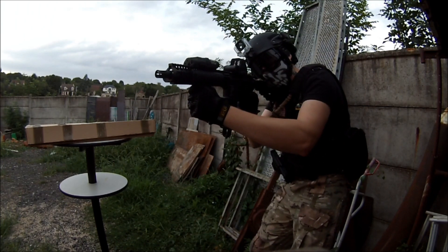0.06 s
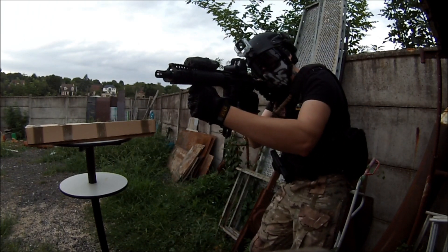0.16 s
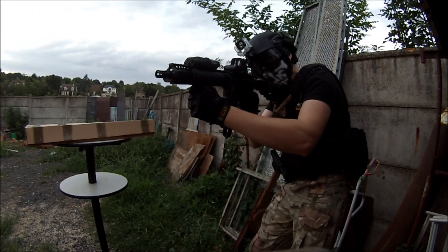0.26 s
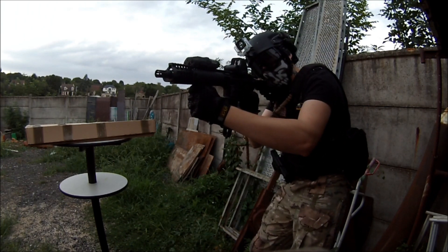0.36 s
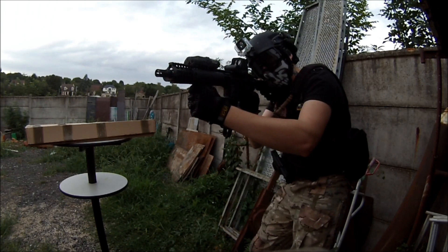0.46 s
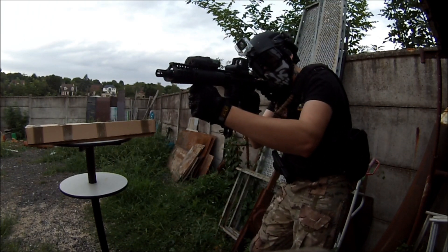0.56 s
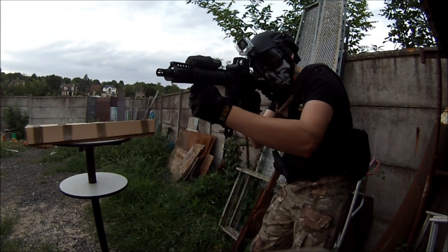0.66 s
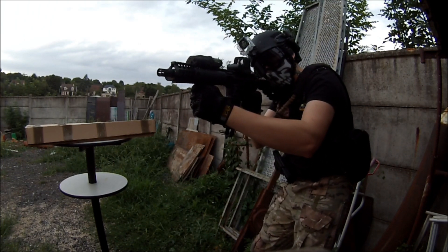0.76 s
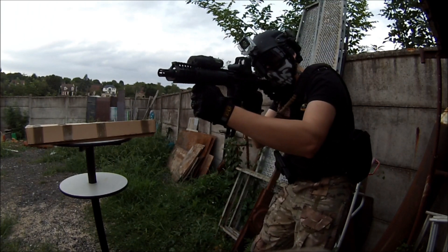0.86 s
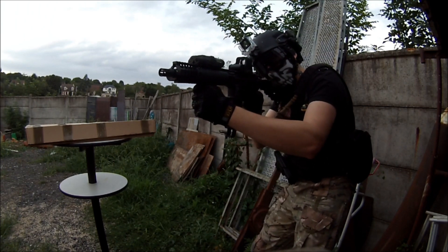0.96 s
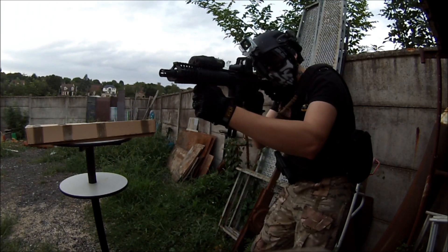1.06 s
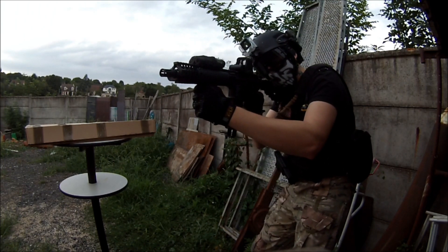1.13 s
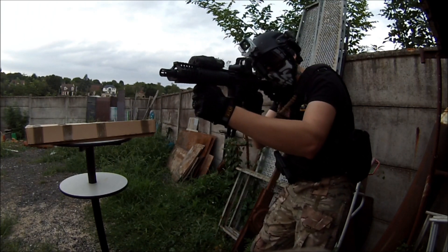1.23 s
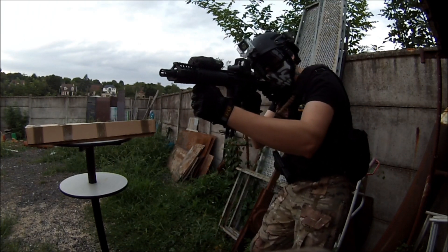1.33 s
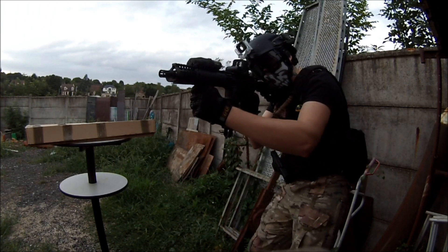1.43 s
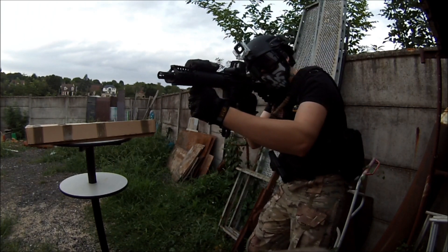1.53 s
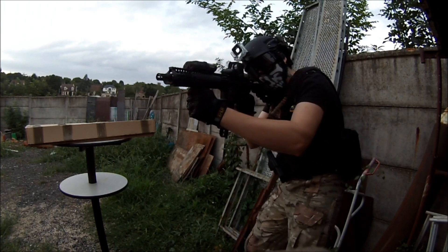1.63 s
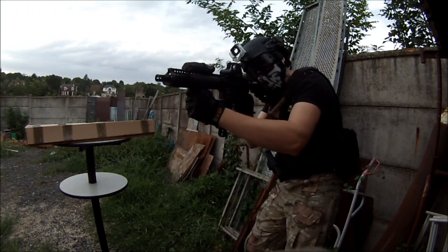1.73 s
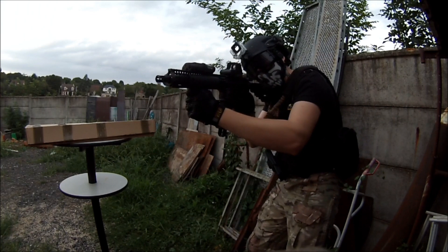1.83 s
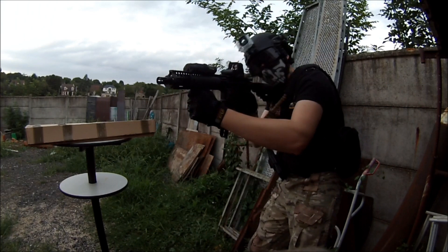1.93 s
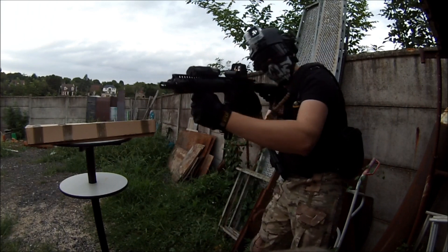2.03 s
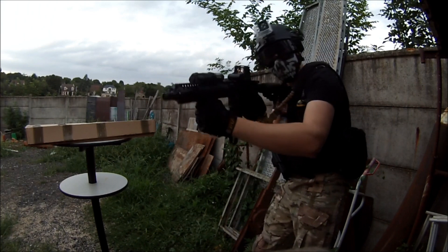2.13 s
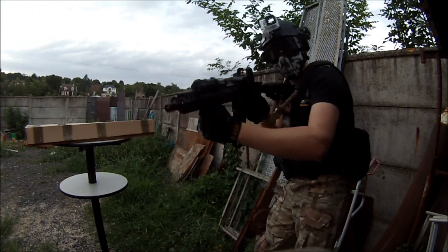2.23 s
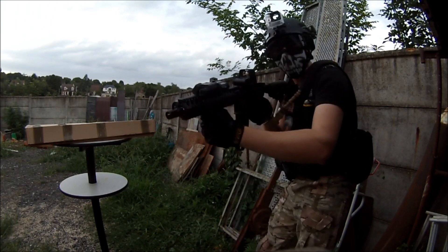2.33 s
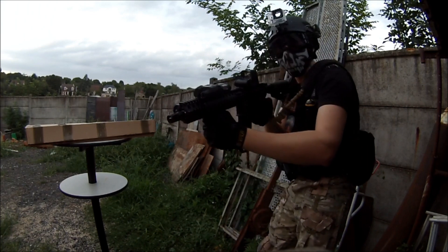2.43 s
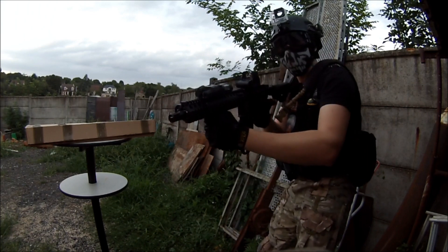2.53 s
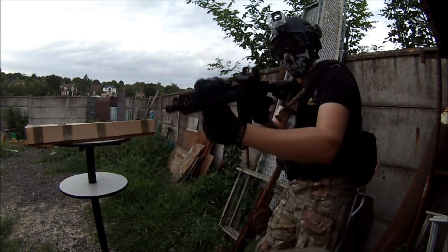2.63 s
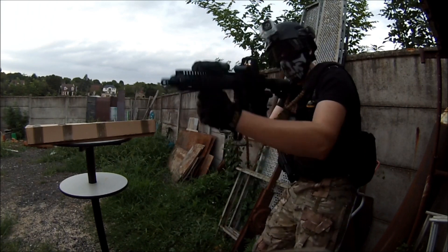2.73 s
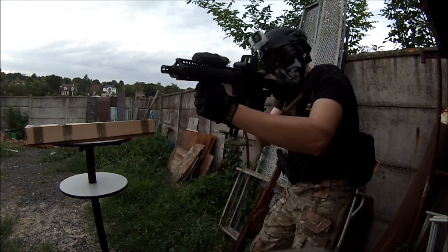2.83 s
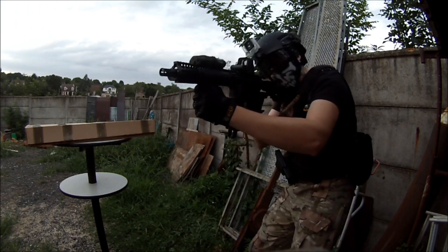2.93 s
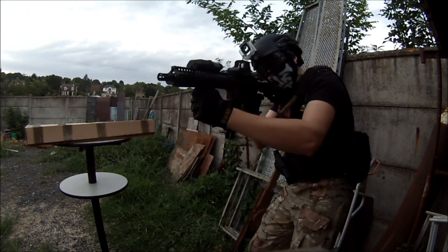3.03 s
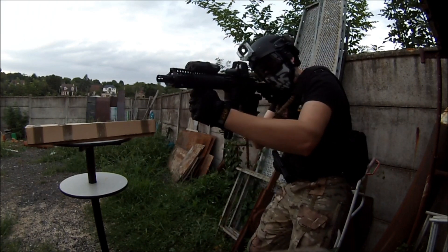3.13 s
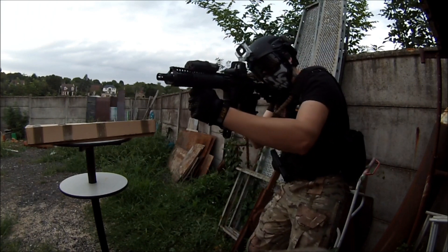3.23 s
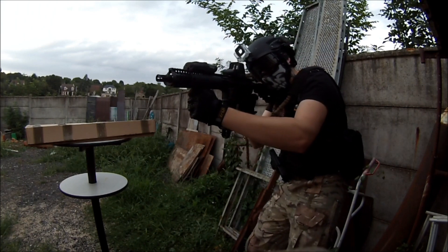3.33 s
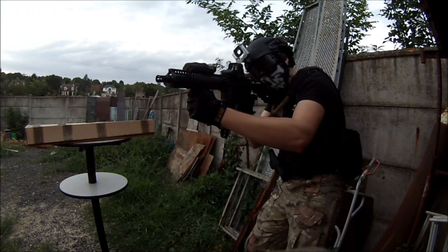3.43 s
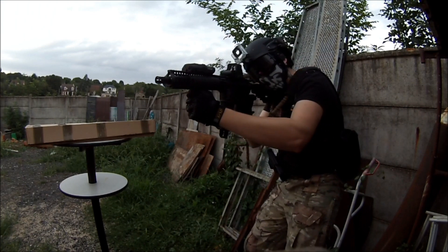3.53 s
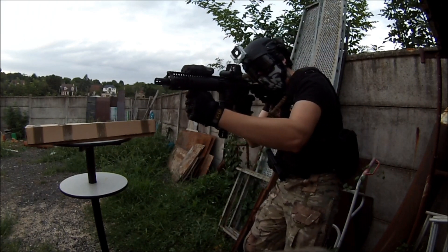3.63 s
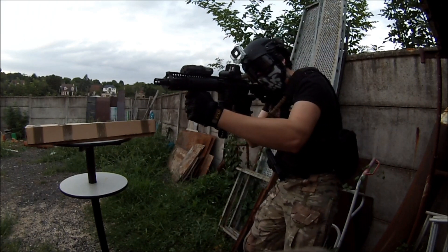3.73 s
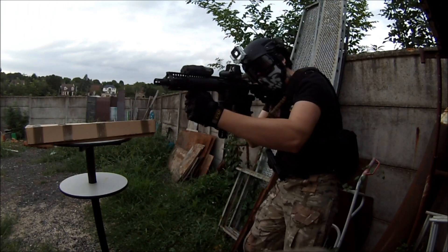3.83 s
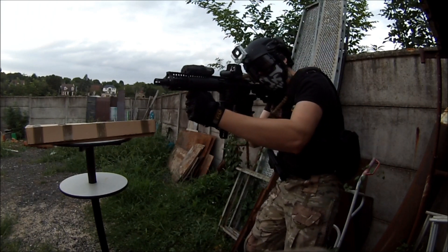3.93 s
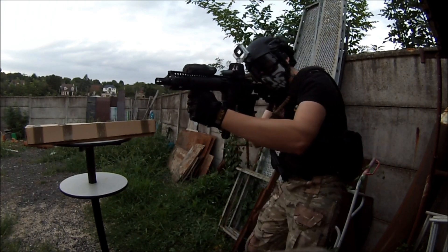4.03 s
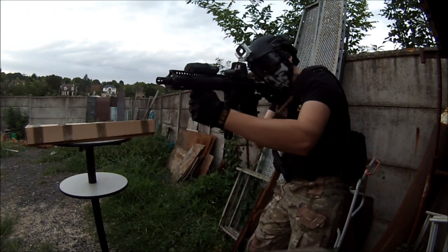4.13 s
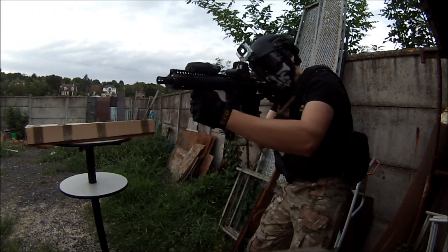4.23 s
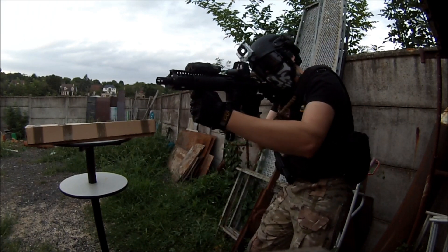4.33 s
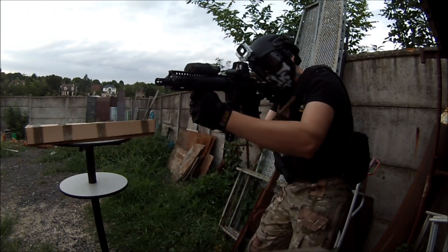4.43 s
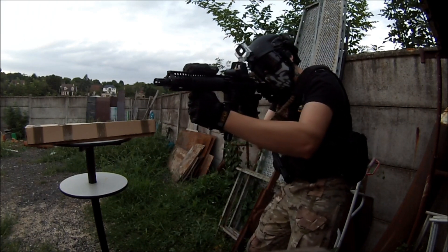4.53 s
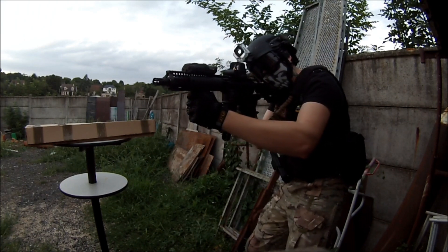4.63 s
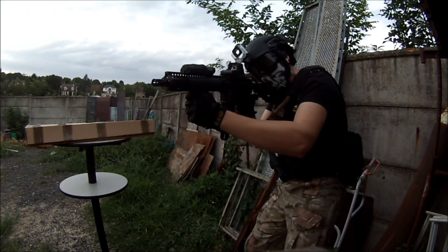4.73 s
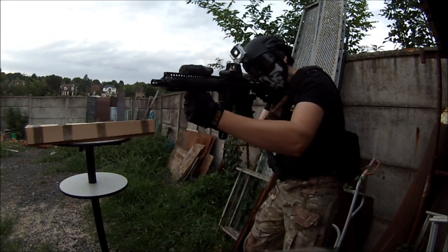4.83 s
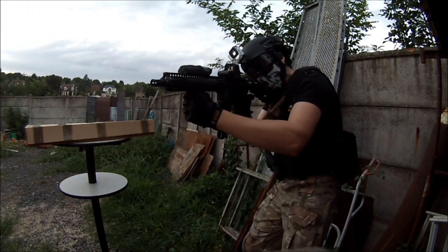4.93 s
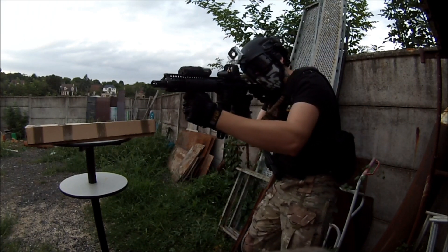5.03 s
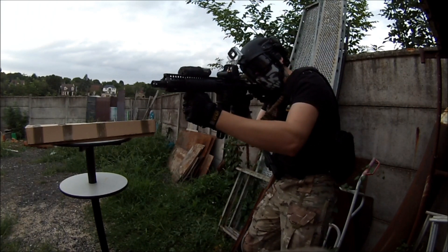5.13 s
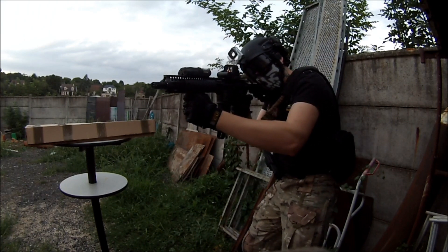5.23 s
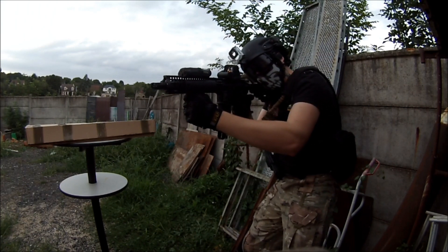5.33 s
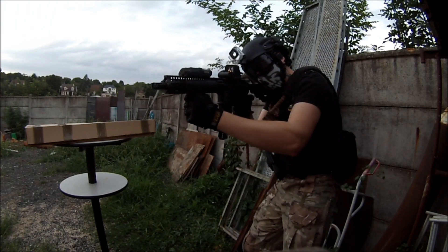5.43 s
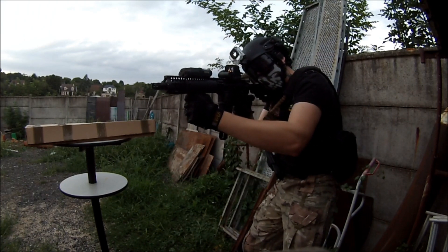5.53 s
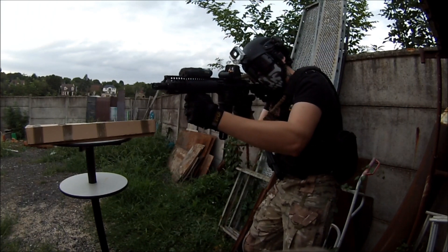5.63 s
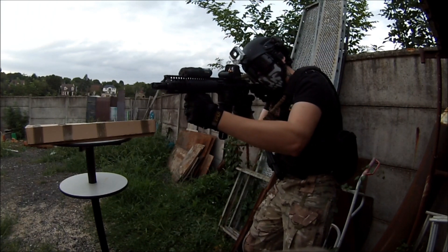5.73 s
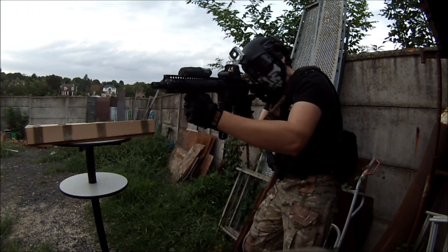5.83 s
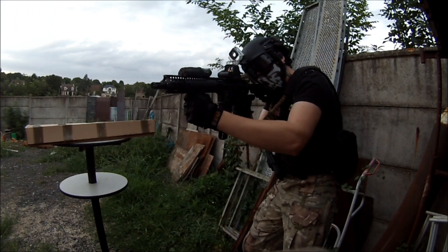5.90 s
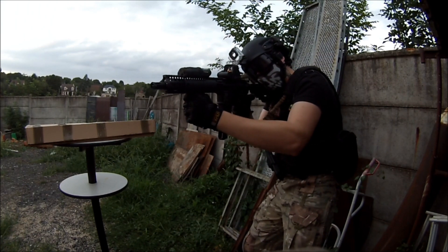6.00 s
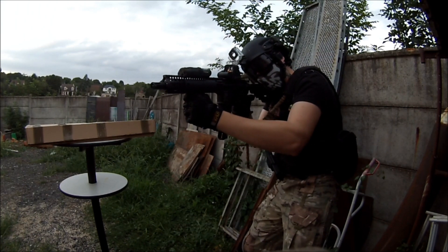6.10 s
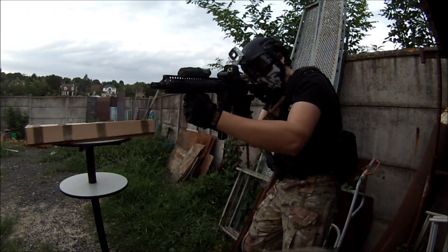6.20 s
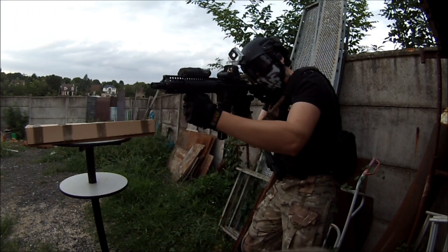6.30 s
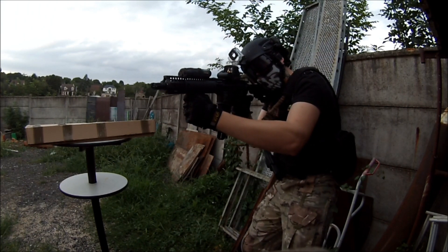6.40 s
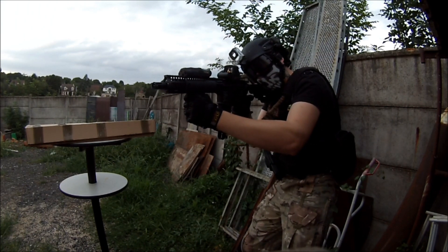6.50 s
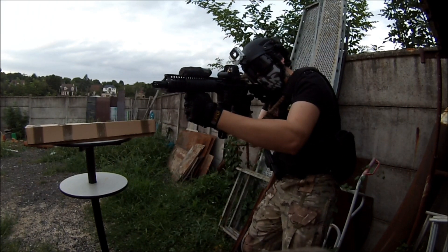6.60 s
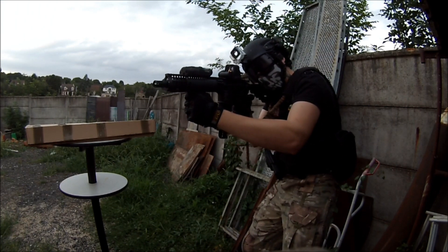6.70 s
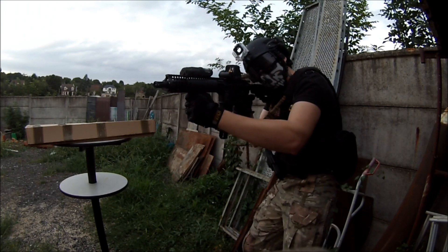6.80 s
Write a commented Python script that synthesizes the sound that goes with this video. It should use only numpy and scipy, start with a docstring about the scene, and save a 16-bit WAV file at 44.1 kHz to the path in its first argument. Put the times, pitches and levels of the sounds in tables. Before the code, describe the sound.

Short automatic bursts from a nearby electric airsoft gun outdoors, then spaced single shots, each a brief gear whine and a sharp snap.

```python
"""Rattling bursts from an electric airsoft rifle a couple of metres away in a walled yard, a pause, then
single shots. In each cycle the motor whines and the gears grind as they wind the spring, the nozzle
clacks, and the piston slams home, exciting the modes of the body. Pellets tick on a target, kit rustles
in the pause, and the yard reflects it all over light wind and distant town.
The slams overload the microphone."""
import sys
import numpy as np
from scipy import signal
from scipy.fft import rfft, irfft
from scipy.io import wavfile
from scipy.ndimage import map_coordinates

SR = 44100
rng = np.random.default_rng(int(sys.argv[2]) if len(sys.argv) > 2 else 0)


def wrap_up_sound(samples):
    """Save the sound to the file named by the first command line argument, as 16-bit audio."""
    columns = np.atleast_2d(samples).T
    # keep every value between -1 and 1, then stretch to whole-number steps
    tamed = np.clip(columns, -1, 1)
    steps = np.round(tamed * 32767).astype(np.int16)
    wavfile.write(sys.argv[1], SR, steps)


N = 302481
LEAD = SR // 4  # samples before t = 0: firing is already under way
SPAN = LEAD + N
MS = SR / 1000  # samples per ms
CYCLE_MS = np.arange(-4410, 4410) / MS  # time about a slam
AFTER_MS = CYCLE_MS[CYCLE_MS >= 0]


# Gearbox cycles, keyed settings (_ms: t/ms, _db: level/dB, wobble: fraction of speed).
# A burst starts from rest and runs on. Lead-in: a faint noise swells just before the gears bite.
CYCLES = {
    "from rest": dict(lead_in_ms=4.3, lead_in_db=-6, whine_db=-22.5, ease_db=-5.5, overtone_db=-1,
                      grind_db=-23.5, catch_db=0.5, drag_db=6, coast_ms=110, wobble=0.0098,
                      clack_db=-14, clack_lead_ms=39.8, slam_db=-3.5),
    "running": dict(lead_in_ms=46, lead_in_db=-1.5, whine_db=-30.5, ease_db=0, overtone_db=-1,
                    grind_db=-31, catch_db=-4, drag_db=8.5, coast_ms=390, wobble=0.033,
                    clack_db=-24.5, clack_lead_ms=27, slam_db=-6),
    "single": dict(lead_in_ms=18.4, lead_in_db=-6, whine_db=-25.5, ease_db=0, overtone_db=-0.45,
                   grind_db=-24, catch_db=3.5, drag_db=9, coast_ms=110, wobble=.005,
                   clack_db=-15, slam_db=-3.8)}
# Trigger pulls: first slam t/s, number of shots, pellet level/dB
BURSTS = [(0.13, 3, -4), (0.5327, 4, -3.5), (1.003, 4, -18.5), (1.4125, 6, -7), (3.2515, 1, -17)]
# Single shots: slam t/s, pinion bite level/dB, clack lead t/ms, pellet level/dB
SINGLES = [(3.5013, -14, 37, -11), (3.8185, -31, 38, -18), (3.9839, -8.5, 26.4, -15.5),
           (4.1452, -10, 37, -16), (4.3231, -6.5, 36, -16), (4.5025, -7, 37.4, -7), (4.672, -6.5, 40, -7.5),
           (5.0614, -8, 34, -11), (5.2209, -20, 38.5, -11.5), (5.3852, -7, 40, -11), (5.549, -27, 37, -24),
           (5.7466, -7.5, 36, -20), (5.9247, -14, 38, -14), (6.0902, -6, 39, -10), (6.2643, -11, 34, -14),
           (6.4059, -20, 29, -7), (6.6167, -5, 38, -11), (6.8299, -9, 36, -16)]

def shots(period_s=.08, late_s=.0008):
    """Periodic impacts under a held trigger. Rows: slam t/s, cycle, clack lead t/ms, pellet level/dB."""
    rows = [(-.06, "running", CYCLES["running"]["clack_lead_ms"], BURSTS[0][2])]  # still echoing at t = 0
    for first, count, pellet_db in BURSTS:
        for k in range(count):
            kind = "running" if k else "from rest"
            s = first + k * period_s + late_s * (k > 0)
            rows.append((s, kind, CYCLES[kind]["clack_lead_ms"], pellet_db))
    return rows + [(s, "single", lead_ms, pellet_db) for s, _, lead_ms, pellet_db in SINGLES]


# Spectra of gear grind, nozzle clack and hard impact: f/Hz, relative level/dB
GRIND = [(60, -35), (300, -11), (620, -5.5), (775, 2.5), (950, -4), (1200, -4), (1550, 1.5), (1850, -4),
         (2500, 0.5), (3200, 0.5), (4700, -3), (7400, -10), (9000, -13.5), (15000, -20.5)]
CLACK = [(50, -3.5), (150, 12.5), (350, 4.5), (800, -6.5), (1600, 10), (3000, -13.5), (5000, -15.5),
         (6500, 11), (9000, -28.5), (15000, -31.5)]
CRACK = [(200, -16), (1000, -6.5), (2600, 1), (4400, -3), (5800, -5), (7200, -5.5), (9000, -13),
         (15000, -18.5)]

def rifle(crack_db=-6, ring_db=-27, rattle_db=-25, ring_lag_ms=1.6, uneven_db=-0.14):
    """Source and resonator: winding, clack and slam excite the pinion, shell and body at each shot."""
    whines, grinds, clacks, pops, cracks, blows = np.zeros((6, SPAN))
    for s, kind, lead_ms, _ in shots():
        start = s + CYCLE_MS[0] / 1000
        force = undb(CYCLES[kind]["slam_db"] + uneven_db * rng.standard_normal())
        whine, grind = gears(kind)
        add(whines, whine, start)
        add(grinds, grind, start)
        add(clacks, undb(CYCLES[kind]["clack_db"]) * nozzle(), start - lead_ms / 1000)
        add(pops, force * slam(), start)
        add(cracks, force * piston_crack(), start)
        add(blows, np.array([force]), s + ring_lag_ms / 1000)
    pinion = resonate(whines, hz=3626, width_hz=600, db=2.5) + pinion_bites()
    shell = resonate(colour(grinds, GRIND), hz=787, width_hz=26, db=1)
    ring = signal.oaconvolve(blows + undb(rattle_db) * clacks, body_ring())[:SPAN]
    impacts = pops + colour(clacks, CLACK) + undb(crack_db) * colour(cracks, CRACK)
    return pinion + shell + impacts + undb(ring_db) * ring


def slam(pop_hz=2350, pop_db=3, closing_ms=3.02, peak_ms=1.135, sweep_ms=1.202, sink_ms=4,
         thump_hz=150, thump_db=-11, thump_ms=3.13, scatter=0.066, radiate_hz=55):
    """Compression: an air pop rises in pitch as the piston closes its cushion, over a low thump."""
    ms = CYCLE_MS - peak_ms
    hz = pop_hz * np.exp(np.where(ms < 0, ms / sweep_ms, -ms / sink_ms)) * (ms > -closing_ms)
    phase = 2 * np.pi * np.cumsum(hz) * (1 + scatter * rng.standard_normal()) / SR
    pop = -np.sin(phase) * swell(ms, rise=3.8, t60=6)
    thump = tone(thump_hz, CYCLE_MS) * np.exp(-np.abs(CYCLE_MS - 1) / thump_ms)
    radiation = signal.butter(1, radiate_hz, "high", fs=SR, output="sos")  # small body, little deep bass
    return signal.sosfilt(radiation, undb(pop_db) * pop + undb(thump_db) * thump)


def piston_crack():
    """Friction, then impact: the piston scrapes along the cylinder, touches its cushion and hits home."""
    scrape = 0.055 * contact(-CYCLE_MS, 14)
    touch = contact(CYCLE_MS + 0.9, 11)
    home = 2.38 * contact(CYCLE_MS - .7, 11.7)
    return scrape + touch + home


# Modes of the rifle body: f/Hz, relative level/dB, T60/s
BODY_MODES = [(172, 3, 0.047), (252.5, -5.5, 0.18), (473, 16.5, 0.017), (575, -10, 0.027), (770, 5, 0.036),
              (889, 10.5, 0.0075), (1366, -2.5, 0.057), (1473, -4, 0.039), (1437, 18, 0.023),
              (1470, -6.5, 0.052), (1750, -7, .025), (2410, -8, .03), (2620, 9.5, 0.095),
              (2800, -22.5, .03), (4410, -16, .025), (7400, -32, .02)]

def body_ring():
    """Impulse response as a sum of damped modes; neighbouring modes swing in antiphase."""
    t = np.arange(SR // 10) / SR
    return sum((-1) ** k * undb(db) * np.sin(2 * np.pi * hz * t) * fade(t, t60)
               for k, (hz, db, t60) in enumerate(BODY_MODES))


def nozzle(bounce_ms=1.7):
    """Repeated impact: the nozzle is drawn back with a tick and rattles against its stop."""
    lag_ms = rng.normal(0, 1.0)
    tick = 0.93 * contact(CYCLE_MS + 1.1, 2.9)
    stop = 1.1 * contact(CYCLE_MS + 1, 24)
    bounce = 0.83 * contact(CYCLE_MS - bounce_ms - lag_ms, 24)
    return tick + stop + bounce


# Tooth-mesh harmonics, fundamental first: relative level/dB
MESH_HARMONICS = [0.5, -6.5, -8.5, -21]

def gears(kind, throb=0.36, bite=0.12, bevel_teeth=38, teeth_per_buzz=5, buzz_db=-12):
    """Modulation: teeth whine and grind; an off-centre bevel gear makes the whine throb once a turn."""
    n, cycle = len(CYCLE_MS), CYCLES[kind]
    hz = motor_speed(*MOTOR[kind])
    bevel = np.sin(2 * np.pi * (np.cumsum(hz) / SR / bevel_teeth + rng.random()))
    mesh_hz = hz * (1 + cycle["wobble"] * bevel + .008 * wander(n, 400) + .006 * rng.standard_normal())
    mesh_phase = 2 * np.pi * np.cumsum(mesh_hz) / SR
    buzz_phase = mesh_phase / teeth_per_buzz  # the motor buzzes twice a turn of its ten-tooth pinion
    whine = sum(undb(db + k * cycle["overtone_db"]) * worn_teeth((k + 1) * mesh_phase, rate_hz=780)
                for k, db in enumerate(MESH_HARMONICS))
    whine = whine * (1 + throb * bevel) + undb(buzz_db) * worn_teeth(buzz_phase, rate_hz=200)
    grind = rng.standard_normal(n) * (1 + bite * np.sin(buzz_phase)) * undb(2 * wander(n, 400))
    whine_gain, grind_gain = gear_load(kind)
    return whine * whine_gain, grind * grind_gain


def worn_teeth(phase, rate_hz):
    """Random modulation broadens a partial: worn teeth meet early or late, hard or soft."""
    error = wander(len(phase), rate_hz) + 1j * wander(len(phase), rate_hz)
    return np.real((.7 + .52 * error) * np.exp(1j * phase))


# Motor, by cycle: winding t/ms, initial mesh f/Hz, mesh f/Hz that the full spring allows
MOTOR = {"from rest": (71.5, 2550, 3770), "running": (55, 5430, 3480), "single": (64.7, 3660, 3750)}

def motor_speed(wind_ms, start_hz, loaded_hz, sag_hz_per_ms=24, inertia_ms=34):
    """Inertial lag: the mesh rate relaxes towards a limit that sags as the spring tightens."""
    ms = np.maximum(CYCLE_MS, -wind_ms)
    allowed = loaded_hz - sag_hz_per_ms * ms
    return allowed + (start_hz - allowed[0]) * np.exp(-(ms + wind_ms) / inertia_ms)


def gear_load(kind, catch_ms=6, drag_lead_ms=33, drag_ms=8, ease_lead_ms=25, ease_ms=7,
              whine_rise_ms=2, whine_stop_ms=25, tighten_db=1):
    """Noise follows load: after a faint lead-in, gears catch the piston, drag the nozzle, ease, coast."""
    cycle, wind_ms = CYCLES[kind], MOTOR[kind][0]
    age, after = np.maximum(CYCLE_MS + wind_ms, 0), np.maximum(CYCLE_MS, 0)
    lead_in = np.clip((CYCLE_MS + wind_ms) / cycle["lead_in_ms"] + 1, 0, 1) ** .5
    catch = cycle["catch_db"] * np.exp(-age / catch_ms)
    drag = cycle["drag_db"] * np.exp(-((CYCLE_MS + drag_lead_ms) / drag_ms) ** 2)
    ease = cycle["ease_db"] * np.exp(-((CYCLE_MS + ease_lead_ms) / ease_ms) ** 2)
    grind = undb(cycle["grind_db"] + np.where(age > 0, catch + drag, cycle["lead_in_db"])) * lead_in
    onset = 1 - np.exp(-age / whine_rise_ms)
    whine = undb(cycle["whine_db"] + ease + tighten_db * age / wind_ms) * onset
    return whine * fade(after, whine_stop_ms), grind * fade(after, cycle["coast_ms"])


def pinion_bites(ring_hz=3720, ring_ms=24, bite_db=1, clash_db=-10):
    """Free vibration: in a single shot the pinion rings briefly when its teeth catch the load."""
    out = np.zeros(SPAN)
    ring = tone(ring_hz, AFTER_MS) * (fade(AFTER_MS, ring_ms) - fade(AFTER_MS, 2.9))
    for s, db, _, _ in SINGLES:
        clash = undb(clash_db) * colour(contact(AFTER_MS, 4.6), CRACK)
        add(out, undb(db + bite_db) * (ring + clash), s - MOTOR["single"][0] / 1000)
    return out


# Pellet flight, by cycle: t/s
FLIGHT_S = {"from rest": .209, "running": .2071, "single": .2057}
# Spectrum of a knock on the target: f/Hz, relative level/dB
KNOCK = [(120, -10), (500, -3.5), (1100, -3), (1500, -5), (2200, -9), (3500, -14.5), (8000, -41.5)]

def pellets(knock_db=-2, tick_db=-16, wall_echo=0.16, scatter_db=2.5, repeat_s=.0495, repeat_db=-11.5):
    """Impact and reflection: each pellet lands with a double knock, then a faint, dull wall echo."""
    knocks, ticks = np.zeros((2, SPAN))
    dull_echo = tone(600, AFTER_MS) * fade(AFTER_MS - 11, 6.4)
    for s, kind, _, db in shots():
        lands = s + FLIGHT_S[kind]
        strength = undb(db + CYCLES[kind]["slam_db"] + scatter_db * rng.standard_normal())
        hit = contact(AFTER_MS, 3.4) + 0.51 * contact(AFTER_MS - 3.2, 6.5)
        # the knock comes back once more, fainter
        for at, gain in ((lands, strength), (lands + repeat_s, strength * undb(repeat_db))):
            add(knocks, gain * (hit + wall_echo * dull_echo), at)
            add(ticks, gain * hit, at)
    return undb(knock_db) * colour(knocks, KNOCK) + undb(tick_db) * colour(ticks, CRACK)


def ping(at_s=1.976):
    """Modal ringing: a stray pellet excites two modes of a small piece of metal."""
    out, t = np.zeros(SPAN), np.arange(SR // 4) / SR
    for hz, db, t60 in ((5920, -45, .11), (11130, -47, .08)):
        add(out, undb(db) * np.sin(2 * np.pi * hz * t) * fade(t, t60), at_s)
    return out


# Kit rubbing along the rifle: t/s, level/dB, T60/s
RUBS = [(2.161, -50, 0.21), (2.204, -51, 0.67), (2.497, -56, 0.65)]
# Modes of the metal parts: f/Hz, relative level/dB
METAL_MODES = [(2842, -69), (2955, -77), (3984, -78), (4264, -69), (5033, -66.5), (6191, -72), (6277, -73),
               (6912, -74), (7709, -67), (7967, -74), (8274, -75), (8473, -77)]
# Clicks of buckles and fittings: t/s, relative level/dB
FITTINGS = [(2.382, -30), (2.5102, -35.5), (2.988, -45), (3.03, -49)]
# Spectrum of the kit: f/Hz, relative level/dB
KIT = [(1200, -9), (2200, -12), (3300, -4.5), (6000, -8), (9000, -13.5), (15000, -25)]

def handling(click_db=-7, buckle_hz=3550, buckle_db=-13, rub_rise_s=0.0021, metal_db=55):
    """Friction and impact: kit rubs, metal rings and fittings clink as the rifle is lowered and raised."""
    t = np.arange(-LEAD, N) / SR
    rubbing = sum(undb(db) * swell(t - s, rub_rise_s, t60) for s, db, t60 in RUBS)
    metal = sum(undb(db + metal_db) * np.sin(2 * np.pi * (hz * t + rng.random()))
                for hz, db in METAL_MODES)
    friction = rng.standard_normal(SPAN) * undb(2 * wander(SPAN, 70))
    out = rubbing * (friction + metal)
    clink = undb(buckle_db) * tone(buckle_hz, AFTER_MS) * fade(AFTER_MS, 46)
    for s, db in FITTINGS:
        add(out, undb(db + click_db) * (contact(AFTER_MS, 22) + clink), s)
    return colour(out, KIT)


# Echoes of near clutter, and of far fence and houses: arrival t/ms, relative level/dB, rise t/ms, T60/ms
NEAR_ECHOES = [(5.5, 7.5, 0.5, 32), (22.2, -9, 18, 84)]
FAR_ECHOES = [(45.8, -5.5, 7, 810), (92, 4.5, 44, 230), (290, -11, 62, 190)]
# Their spectra: f/Hz, relative level/dB
NEAR_COLOUR = [(50, -36), (130, 7.5), (300, -8.5), (800, 3), (2500, 1), (4000, -3), (7300, 2.5), (9500, 2),
               (15000, -7)]
FAR_COLOUR = [(50, -23.5), (105, 1.5), (170, -6), (330, -6), (800, -1.5), (2000, -0.5), (2700, 1.5),
              (3700, -5.5), (7300, -4), (8800, -11.5), (15000, 3)]

def yard(x, near_db=-16, far_db=-18, wall_db=-15, wall_hz=900, wall_ms=11.6):
    """Reflection: the wall behind slaps back, clutter scatters, and far echoes shift with the breeze."""
    delayed = np.pad(x, (int(wall_ms * MS), 0))[:SPAN]
    wall = signal.sosfilt(signal.butter(1, wall_hz, fs=SR, output="sos"), delayed)
    breeze = 1.5 * wander(SPAN, 3)  # crossfade angle between two independent echo clouds
    far = np.cos(breeze) * echoes(x, FAR_ECHOES, FAR_COLOUR)
    far += np.sin(breeze) * echoes(x, FAR_ECHOES, FAR_COLOUR)
    near = echoes(x, NEAR_ECHOES, NEAR_COLOUR)
    return undb(wall_db) * wall + undb(near_db) * near + undb(far_db) * far


def echoes(x, groups, spectrum):
    """Diffuse scattering: groups of reflections build up, die away and add in power."""
    ms = np.arange(SR * 2 // 3) / MS
    power = sum((undb(db) * swell(ms - arrival, rise, t60)) ** 2 for arrival, db, rise, t60 in groups)
    cloud = rng.standard_normal(len(ms)) * np.sqrt(power) * undb(2 * wander(len(ms), 500))
    cloud /= np.sqrt(np.sum(cloud ** 2))
    return signal.oaconvolve(x, colour(cloud, spectrum))[:SPAN]


# Spectrum of wind and town: f/Hz, relative level/dB
AMBIENT = [(15, -45), (25, -9), (59, -15.5), (77, -18), (109, -15.5), (415, -28), (462, -22), (588, -28),
           (1210, -32), (1540, -29.5), (1810, -34), (3730, -42), (15000, -59)]

def outdoors(level_db=-54, swell_db=2.7):
    """Ambient noise floor: light wind and distant town, slowly swelling."""
    return colour(rng.standard_normal(N), AMBIENT) * undb(level_db + swell_db * wander(N, 2.3))


def undb(db):
    """Amplitude ratio of a level in dB."""
    return 10 ** (np.asarray(db) / 20)


def add(out, x, s):
    """Superposition: mix x into out from time s on."""
    i = LEAD + int(round(s * SR))
    a, b = max(i, 0), min(i + len(x), len(out))
    if b > a:
        out[a:b] += x[a - i:b - i]


def colour(x, points, size=4096):
    """Minimum-phase filter through (f/Hz, level/dB) points; white noise keeps its power."""
    hz, db = np.transpose(points)
    bins_hz = np.arange(size // 2 + 1) * SR / size
    gain = undb(np.interp(np.log(bins_hz + 1), np.log(hz), db))
    cepstrum = irfft(np.log(gain / np.sqrt(np.mean(gain ** 2))))
    cepstrum[1:size // 2] *= 2
    cepstrum[size // 2 + 1:] = 0
    return signal.oaconvolve(x, irfft(np.exp(rfft(cepstrum))))[:len(x)]


def resonate(drive, hz, width_hz, db):
    """Forced resonance: a part reinforces the drive near its natural frequency."""
    b, a = signal.iirpeak(hz, hz / width_hz, fs=SR)
    return drive + undb(db) * signal.lfilter(b, a, drive)


def wander(n, rate_hz):
    """Smooth random fluctuation with a standard deviation near 1."""
    knots = rng.standard_normal(n // 16 + 4)[:int(n * rate_hz / SR) + 3]
    return map_coordinates(knots, [np.arange(n) * rate_hz / SR], order=3, mode="nearest")


def tone(hz, ms):
    """Simple harmonic motion."""
    return np.sin(2 * np.pi * hz * ms / 1000)


def fade(t, t60):
    """Exponential decay from t = 0, down 60 dB at t60 (in the unit of t)."""
    return (t >= 0) * np.exp(-np.log(1000) * np.maximum(t, 0) / t60)


def swell(t, rise, t60):
    """Exponential rise to a peak at t = 0, then exponential decay."""
    return np.exp(np.minimum(t, 0) / rise) * fade(np.maximum(t, 0), t60)


def contact(ms, t60_ms):
    """Broadband transient of two hard parts meeting."""
    return rng.standard_normal(len(ms)) * fade(ms, t60_ms)


def scene():
    """Superposition of direct sound, the yard's reflections and ambient noise."""
    direct = rifle() + pellets() + ping() + handling()
    return ((direct + yard(direct))[LEAD:] + outdoors())[None]


def record(dry, knee=3.3, top_hz=15400):
    """Saturation and band limiting: the microphone flattens the slams and cuts the highest treble."""
    held = dry / (1 + np.abs(dry) ** knee) ** (1 / knee)
    return signal.sosfilt(signal.ellip(10, .2, 90, top_hz, fs=SR, output="sos"), held)


dry = scene()
out = record(dry)
wrap_up_sound(out)
```